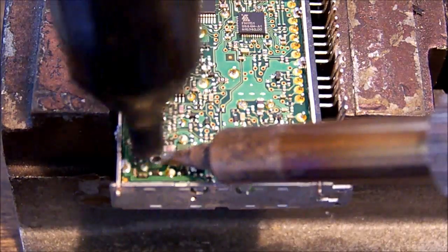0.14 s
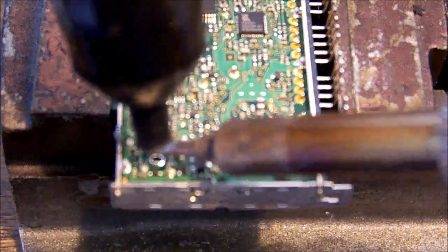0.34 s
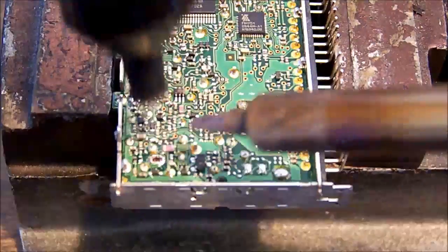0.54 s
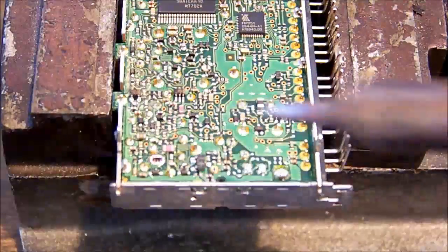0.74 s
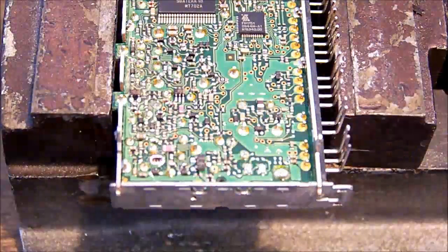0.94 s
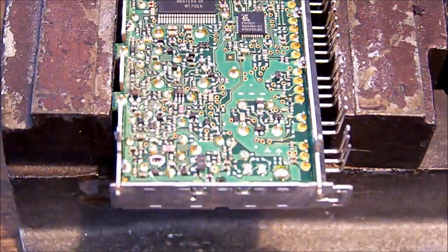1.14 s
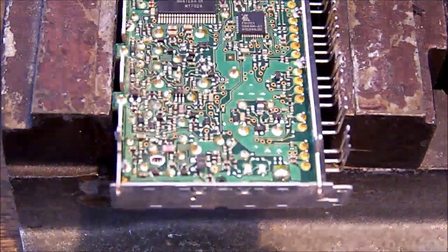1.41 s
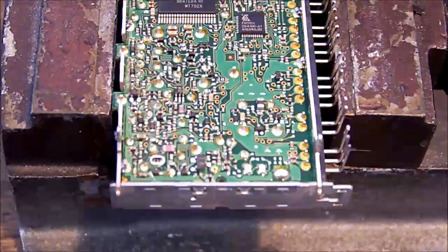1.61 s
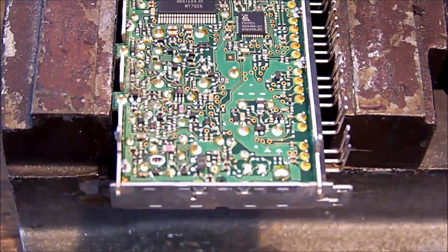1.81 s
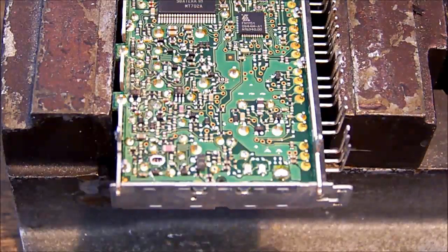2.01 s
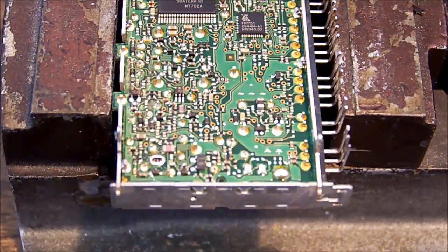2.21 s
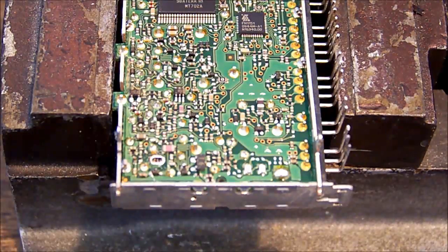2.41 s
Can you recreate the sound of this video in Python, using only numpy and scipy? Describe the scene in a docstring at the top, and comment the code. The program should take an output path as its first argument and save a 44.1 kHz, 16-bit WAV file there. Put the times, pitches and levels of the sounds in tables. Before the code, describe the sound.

Desoldering pump fires with a loud hard double click and short room echo, then metal tool rattles down

```python
"""Desoldering pump and a metal tool

A spring-loaded desoldering pump fires close to a camera: its catch, then its plunger, makes a noise burst
and rings the barrel. The camera's limiter ducks and recovers, so the workshop's echo hangs on after the snap.
Then a metal tool is put down to the left: noise bursts rattle, decaying sines ring and thump the bench.
Small handling ticks and a soft bump are short noise bursts, over steady noise hiss and a faint sine hum."""
import sys
import numpy as np
from scipy import signal
from scipy.fft import rfft, irfft, next_fast_len
from scipy.io import wavfile
from scipy.ndimage import uniform_filter1d

SR = 44100
rng = np.random.default_rng(int(sys.argv[2]) if len(sys.argv) > 2 else 0)


def transcribe(signal):
    """Save signal, clipped to [-1, 1], as a 16-bit WAV file at the path in sys.argv[1]."""
    frames = np.atleast_2d(signal).T
    limited = np.clip(frames, -1, 1)
    pcm = np.round(limited * 32767).astype(np.int16)
    wavfile.write(sys.argv[1], SR, pcm)


N = 112454
T = np.arange(N) / SR  # time in seconds

# In all tables, t60_s is the time to fade by 60 dB; likeness is how alike left and right are, 1 = the same.
# Steady noise: pitch_hz, relative level_db per Hz
HISS_COLOUR = [(15, -29), (30, 0), (70, -4.5), (258, -9), (351, -17.5), (400, -15), (622, -14.5),
               (978, -17.5), (1500, -18), (5830, -22.5), (7400, -25), (9620, -54), (16300, -120)]
# Left-right likeness of the hiss: pitch_hz, likeness
HISS_ALIKE = [(30, 0.23), (150, 0.68), (700, 0.36), (7000, 0.48)]
# Faint steady tones: pitch_hz, level_db (rms)
HUM_TONES = [(43.1, -73), (398.4, -80), (441.4, -79.5)]
# Last of an earlier metal ring: pitch_hz, relative level_db, t60_s
FADING_MODES = [(1922, -61, .9), (2597, -62.5, 0.77), (2720, -63.5, 0.97), (5275, -57.5, .4)]
HISS_DB, FADING_DB = -57.5, -4
FADING_ECHO_DB, FADING_ECHO_T60_S = -54, 1

# Small handling ticks: start_s, level_db, t60_s, centre_hz
HANDLING_TICKS = [(0.162, -56.5, 0.043, 2960), (0.2028, -33, 0.014, 2400), (0.4500, -29.5, 0.0066, 4880),
                  (0.680, -50, 0.015, 3210), (1.983, -55, .04, 4030)]

# The pump's two blows, catch and plunger: start_s, level_db, hold_s, t60_s, centre_hz of the ring
PUMP_BLOWS = [(0.2082, 10.5, 0.0024, 0.021, 5413), (0.2148, 7.5, 0.0041, 0.016, 4250)]
# Dense sound of the barrel: pitch_hz, relative level_db per Hz
BARREL_COLOUR = [(35, -48.5), (60, -21.5), (175, -7), (437, -15), (750, -8.5), (1050, -14.5), (1450, -15),
                 (1850, -7.5), (2200, -10), (2650, -5), (2900, -19), (3250, -9), (4770, -3.5), (5610, -8.5),
                 (7500, -5), (9880, -44.5), (16700, -120)]
# Single ringing tones of the barrel: pitch_hz, relative level_db, t60_s
BARREL_MODES = [(175, -10.5, .035), (680, -8, .025), (860, -11, .025), (1805, -3, .025), (1940, -6, .025),
                (3282, -1, .028), (3760, -2, .022), (4238, 1, .032), (4358, -3, .03), (4779, 0, .03),
                (4920, 0, .03), (5955, -1, .03), (6840, -1, .035)]
# Left-right likeness of the snap: pitch_hz, likeness
SNAP_ALIKE = [(200, 0.82), (1500, 0.96), (3000, 0.67), (7000, 0.97)]
# Stereo balance of the snap: pitch_hz, left_over_right_db
SNAP_PAN = [(700, -0.5), (1500, 4), (3000, 4), (4500, 1.5), (6500, -2)]
# The spring settles: start_s, level_db, t60_s, centre_hz
SPRING_TICKS = [(0.2338, -12.5, .008, 4213), (0.2395, -18.5, .02, 4100)]
SNAP_ATTACK_S, SNAP_LEAD_S = .0009, .00003  # rise; the right side hears it first
BARREL_RING_DB, FOCUS_DB = -6.5, 3.5  # ring against the burst; boost around each blow's centre

# How long the room's echo lasts: pitch_hz, t60_s
ROOM_T60 = [(100, 0.47), (700, 0.43), (3000, 0.46), (7000, 0.4)]
# Left-right likeness of the echo: pitch_hz, likeness
ROOM_ALIKE = [(150, 0.97), (700, 0.9), (1400, 0.5), (2500, 0.1), (7000, 0)]
# The snap as the room returns it: pitch_hz, relative level_db per Hz
SNAP_ECHO_COLOUR = [(30, -17.5), (100, -0.5), (500, -12.5), (740, 1), (1000, -11), (1300, -7), (1700, -13),
                    (2000, -6.5), (2600, -8), (3850, -3.5), (4300, -5.5), (5200, -1.5), (5600, -9.5),
                    (6200, -5.5), (6950, 0), (7500, -4.5), (9500, -46)]
# Colour of the tool's echo: pitch_hz, relative level_db
TOOL_ECHO_COLOUR = [(80, 13), (200, 8), (1300, 1), (4400, -6), (7000, -1.5)]
ROOM_DB, ROOM_ONSET_S = -24, .012
SNAP_ECHO_DB = 32.5  # for a one-sample impulse, which holds little energy
TOOL_ECHO_DB = 8  # the tool lies farther off than the pump

# The tool's contacts: start_s, level_db, then crack_db and low_ring_db relative to it, thump_db of the bench,
# favoured band_hz, struck part's note_hz, note_db, note_t60_s
TOOL_CONTACTS = [(1.6844, -21.5, 13, 4, -47, 5100, 4837, -23, 0.041),
                 (1.7249, -29, 5, -8, -46, 6750, 3306, -28, 0.037),
                 (1.7545, -42.5, -1, 11.5, -45, 7200, 2900, -43, 0.041),
                 (1.7669, -29.5, -1, -1.5, -51, 7600, 3480, -32, 0.027),
                 (1.7773, -22, 13.5, -2.5, -43.5, 6724, 4407, -22, 0.089),
                 (1.7793, -33, -1, -8, -54.5, 2100, 2030, -21, 0.028),
                 (1.7913, -26.5, -9, -10.5, -46, 3260, 5560, -32, 0.081),
                 (1.8226, -24, 3, -0.5, -52, 3600, 3420, -26, 0.041),
                 (1.8302, -27, 8.5, 1.5, -49.5, 1203, 5340, -26.5, 0.088),
                 (1.8481, -31, -4, -18.5, -40.5, 3950, 4136, -27.5, 0.056),
                 (1.8536, -31, 9.5, -5, -55.5, 6360, 4830, -43.5, .17)]
# Low ringing tones of the tool: pitch_hz, relative level_db, t60_s
TOOL_LOW_MODES = [(1171, -7.5, 0.066), (1298, -2.5, 0.056), (1402, -3.5, 0.094), (1464, -2.5, 0.11),
                  (2050, -9.5, 0.046), (2226, -11.5, 0.092)]
# High ringing tones of the tool: pitch_hz, relative level_db, t60_s
TOOL_HIGH_MODES = [(3810, -14.5, 0.11), (4390, -9, 0.13), (4845, -5, 0.17), (5160, -5, 0.18),
                   (5330, -8, 0.073), (5830, -1, 0.13), (6500, 2.5, .06), (7100, -2.5, .06),
                   (7140, -17, 0.15)]
# Dense upper modes of the tool: pitch_hz, relative level_db per Hz
RATTLE_COLOUR = [(100, -37), (600, -11.5), (1000, -8), (1400, -3), (1700, -7), (2100, -3), (2550, -4),
                 (3450, 0.5), (4200, -1.5), (5100, 5.5), (5900, 1.5), (6700, 4), (7600, -3.5)]
# Stereo balance of the tool: pitch_hz, left_over_right_db
TOOL_PAN = [(500, -1), (1400, 6), (2800, 10.5), (5000, 9.5), (7000, 6)]
# Left-right likeness of the tool's rattle: pitch_hz, likeness
TOOL_ALIKE = [(500, 0.71), (1400, 0.45), (3000, 0.8), (7000, .45)]
# Ringing tones of the bench: pitch_hz, relative level_db, t60_s
BENCH_MODES = [(76.5, -11, 0.21), (93, -7, 0.25), (126.4, -0.5, 0.33), (166, -15.5, 0.23),
               (201.9, -2, 0.42), (381, -10, 0.079)]
TOOL_LOW_DB, TOOL_HIGH_DB = -9.5, -13.5
RATTLE_T60_S, CRACK_T60_S = 0.069, 0.0069
FAVOUR_DB, FAVOUR_OCTAVES = 8.5, 0.061  # boost and width of the band a contact favours
TOOL_LAG_S = 0.00014  # the right side hears it this much later

# Soft bump on the bench: pitch_hz, relative level_db per Hz
NUDGE_COLOUR = [(100, -18), (290, 0), (420, -11), (620, -8), (1170, -9), (2500, -33)]
NUDGE_S, NUDGE_DB, NUDGE_T60_S = 1.7, -54, .06

# What the microphone lets through: pitch_hz, gain_db
MIC_RESPONSE = [(20, -1), (60, 1), (240, 0), (300, -12), (360, 1), (7200, 0), (7600, -6), (8000, -17.5),
                (8500, -40.5), (9500, -71)]
LIMIT_DB, RECOVER_DB_PER_S, LIMIT_HOLD_S = -6, 151.5, .012
TOP_HZ = 16500


def amp(db):
    """Turn decibels into a plain gain."""
    return 10 ** (np.asarray(db) / 20)


def unit(x):
    """Scale a sound to rms 1."""
    return x / np.sqrt(np.mean(x ** 2) + 1e-20)


def fade(t, t60):
    """Natural decay: 60 dB down after t60 seconds."""
    return np.exp(-np.log(1000) * t / t60)


def along(points, hz):
    """Read a curve of (pitch, value) points, joined along a log pitch axis."""
    f, v = np.transpose(points)
    return np.interp(np.log(hz + 1), np.log(f + 1), v)


def filtered(x, response):
    """Multiply the spectrum of x by a response that depends on pitch."""
    n = x.shape[-1]
    m = next_fast_len(n + 4096)
    hz = np.fft.rfftfreq(m, 1 / SR)
    return irfft(rfft(x, m) * response(hz), m)[..., :n]


def hump(hz, centre_hz, octaves):
    """A bell around one pitch, with its top at 1."""
    return np.exp(-.5 * (np.log2((hz + 1) / centre_hz) / octaves) ** 2)


def noise(gain, alike, size=16384):
    """Stereo noise of rms 1: a shared middle plus a side part sets the left-right likeness."""
    def mid_and_side(hz):
        turn = np.arccos(np.clip(along(alike, hz), -1, 1)) / 2
        return gain(hz) * np.array([np.cos(turn), np.sin(turn)])

    mid, side = filtered(rng.standard_normal((2, size)), mid_and_side)
    return unit(np.array([mid + side, mid - side]))


def burst(gain, alike, t60, attack_s=0.00021, hold_s=0):
    """Densely packed modes of one blow, as noise that rises, holds and decays."""
    x = noise(gain, alike)
    t = T[:x.shape[1]]
    shape = np.minimum(t / attack_s, 1) * fade(np.maximum(t - hold_s, 0), t60)
    return unit(x * shape) * np.sqrt(np.mean(shape ** 2))


def ring(modes, scatter_db, size=32768):
    """Decaying sines, with level and phase a little different at every strike."""
    t = T[:size]
    total = np.zeros(len(t))
    for hz, db, t60 in modes:
        level_draw, phase_draw = rng.standard_normal(2)
        tone = np.sin(2 * np.pi * hz * t + np.pi * phase_draw)
        total += amp(db + scatter_db * level_draw) * fade(t, t60) * tone
    return total * (1 - np.exp(-t / 0.00061))  # soft start


def add(track, s, x):
    """Mix x into the track at time s."""
    i = int(round(s * SR))
    track[:, i:i + x.shape[-1]] += x[..., :N - i]


def background():
    """Steady noise hiss, a sine hum and the last of an earlier metal ring with its echo."""
    out = amp(HISS_DB) * noise(lambda hz: amp(along(HISS_COLOUR, hz)), HISS_ALIKE, size=N)
    add(out, 0, amp(FADING_DB) * ring(FADING_MODES, scatter_db=1.0))
    echo = burst(lambda hz: hump(hz, 3300, octaves=1.0), ROOM_ALIKE, FADING_ECHO_T60_S)
    add(out, 0, amp(FADING_ECHO_DB) * echo)
    for hz, db in HUM_TONES:
        out += np.sqrt(2) * amp(db) * np.sin(2 * np.pi * hz * T)
    return out


def ticks(table):
    """Tiny dry contacts: short noise bursts, each around its own pitch."""
    out = np.zeros((2, N))
    for s, db, t60, centre_hz in table:
        tick = burst(lambda hz: hump(hz, centre_hz, octaves=1 / 2), [(1000, .8)], t60)
        add(out, s, amp(db) * tick)
    return out


def pump():
    """Catch and plunger each crack and ring the barrel; the spring settles."""
    out = np.zeros((2, N))
    for s, db, hold, t60, centre_hz in PUMP_BLOWS:
        colour = lambda hz: amp(along(BARREL_COLOUR, hz) + FOCUS_DB * hump(hz, centre_hz, octaves=.3))
        add(out, s, amp(db) * burst(colour, SNAP_ALIKE, t60, SNAP_ATTACK_S, hold))
        add(out, s + SNAP_ATTACK_S, amp(db + BARREL_RING_DB) * ring(BARREL_MODES, scatter_db=2.5))
    side = np.array([[1], [-1]])  # left, right
    balance = lambda hz: amp(side * along(SNAP_PAN, hz) / 2)
    timing = lambda hz: np.exp(-side * 1j * np.pi * hz * SNAP_LEAD_S)
    return filtered(out, lambda hz: balance(hz) * timing(hz)) + ticks(SPRING_TICKS)


def workshop(x, colour):
    """The room's diffuse answer to the left channel: noise that decays at its own rate at each pitch."""
    white = noise(lambda hz: np.ones_like(hz), ROOM_ALIKE, size=32768)
    hz, t, z = signal.stft(white, SR, nperseg=256)
    decay = fade(t, along(ROOM_T60, hz)[:, None])
    tail = signal.istft(z * decay, SR, nperseg=256)[1]
    tail = filtered(tail / np.linalg.norm(tail[0]), lambda hz: amp(along(colour, hz)))
    tail = tail * np.minimum(T[:tail.shape[1]] / ROOM_ONSET_S, 1)
    return amp(ROOM_DB) * signal.fftconvolve(x[:1], tail, axes=1)[:, :N]


def pump_echo():
    """Each blow radiates in all directions and returns from the room as a smooth wash."""
    out = np.zeros((2, N))
    for s, db, *_ in PUMP_BLOWS:
        impulse = signal.unit_impulse(N, int(s * SR))[None]
        out += workshop(amp(db + SNAP_ECHO_DB) * impulse, SNAP_ECHO_COLOUR)
    return out


def tool():
    """A metal tool bounces to rest: each contact rattles, rings favoured modes and thumps the bench."""
    metal, bench = np.zeros((2, 2, N))
    for s, db, crack_db, low_db, thump_db, band_hz, note_hz, note_db, note_t60 in TOOL_CONTACTS:
        favour = lambda hz: FAVOUR_DB * hump(hz, band_hz, FAVOUR_OCTAVES)
        struck = lambda modes: ring([(hz, level + favour(hz), t60) for hz, level, t60 in modes],
                                    scatter_db=1.0)
        rattle_colour = lambda hz: amp(along(RATTLE_COLOUR, hz) + favour(hz))
        crack_colour = lambda hz: (amp(along(RATTLE_COLOUR, hz) + favour(hz) / 2)
                                   * hump(hz, 6800, octaves=0.66))
        crack = burst(crack_colour, TOOL_ALIKE, CRACK_T60_S)
        rattle = burst(rattle_colour, TOOL_ALIKE, RATTLE_T60_S)
        add(metal, s, amp(db) * (rattle + amp(crack_db) * crack))
        add(metal, s, amp(db + low_db + TOOL_LOW_DB) * struck(TOOL_LOW_MODES))
        add(metal, s, amp(db + TOOL_HIGH_DB) * struck(TOOL_HIGH_MODES))
        add(metal, s, ring([(note_hz, note_db, note_t60)], scatter_db=0.0))
        add(bench, s, amp(thump_db) * ring(BENCH_MODES, scatter_db=2.0))
    side = np.array([[1], [-1]])  # left, right
    balance = lambda hz: amp(side * along(TOOL_PAN, hz) / 2)
    timing = lambda hz: np.exp(side * 1j * np.pi * hz * TOOL_LAG_S)
    return bench + filtered(metal, lambda hz: balance(hz) * timing(hz))


def nudge():
    """A hand bumps the bench softly: a dull noise burst with a slow rise."""
    out = np.zeros((2, N))
    colour = lambda hz: amp(along(NUDGE_COLOUR, hz))
    bump = burst(colour, [(1000, 0.76)], NUDGE_T60_S, attack_s=.006, hold_s=.016)
    add(out, NUDGE_S, amp(NUDGE_DB) * bump)
    return out


def scene():
    """Pump and tool with the workshop's answer, small handling sounds and the background."""
    clatter = tool()
    echo = pump_echo() + amp(TOOL_ECHO_DB) * workshop(clatter, TOOL_ECHO_COLOUR)
    return background() + ticks(HANDLING_TICKS) + pump() + echo + clatter + nudge()


def causal(gain):
    """The minimum-phase response with this gain: it rings only after a blow."""
    cepstrum = irfft(np.log(np.maximum(gain, 1e-6)))
    half = len(cepstrum) // 2
    cepstrum[1:half] *= 2  # fold the part before time zero onto the part after it
    cepstrum[half + 1:] = 0
    return np.exp(rfft(cepstrum))


def limiter(x):
    """Turns loud sound down at once, holds, then recovers at a steady rate."""
    power = np.abs(uniform_filter1d(np.mean(x ** 2, axis=0), size=64))
    over_db = np.maximum(10 * np.log10(power + 1e-12) - LIMIT_DB, 0)
    recovery_db = RECOVER_DB_PER_S * T
    falling_db = np.maximum.accumulate(over_db + recovery_db) - recovery_db
    held_db = np.maximum(falling_db, np.interp(T - LIMIT_HOLD_S, T, falling_db))
    return x * amp(-uniform_filter1d(held_db, size=24))


def record(dry):
    """Narrow-band camera microphone, limiter, rounded clipping at full scale and the band limit."""
    heard = filtered(dry, lambda hz: causal(amp(along(MIC_RESPONSE, hz))))
    limited = limiter(heard)
    clipped = limited / (1 + np.abs(limited) ** 8) ** (1 / 8)
    return filtered(clipped, lambda hz: hz < TOP_HZ)


dry = scene()
out = record(dry)
transcribe(out)
```